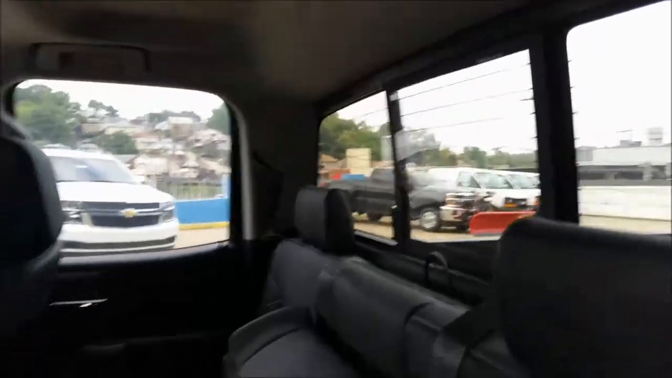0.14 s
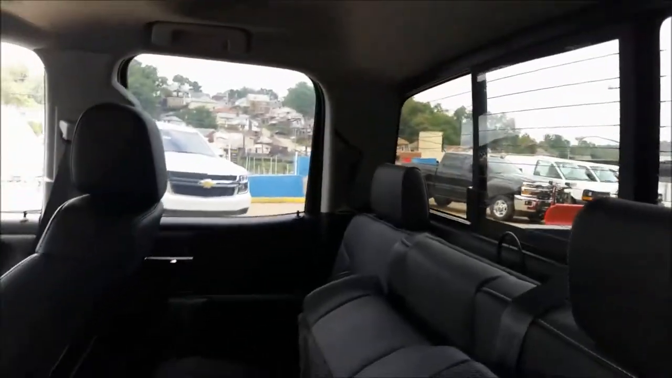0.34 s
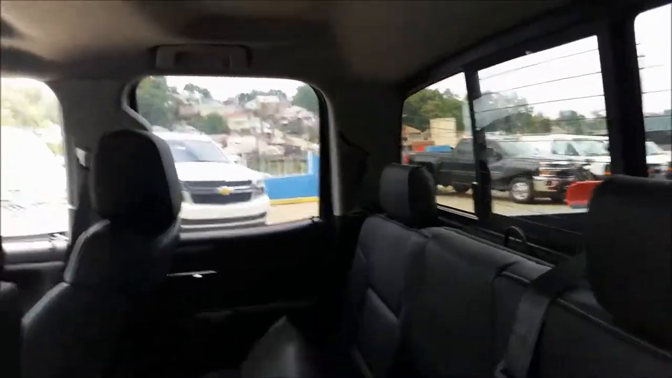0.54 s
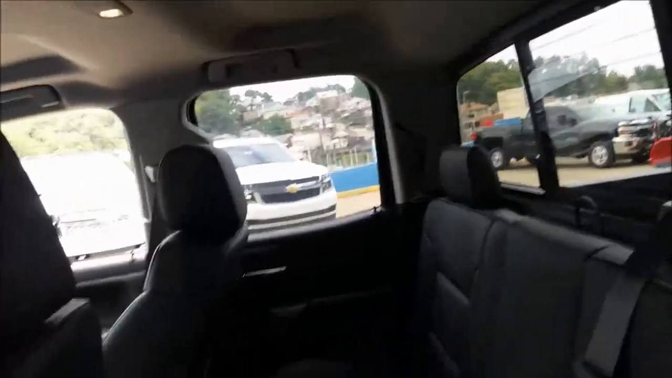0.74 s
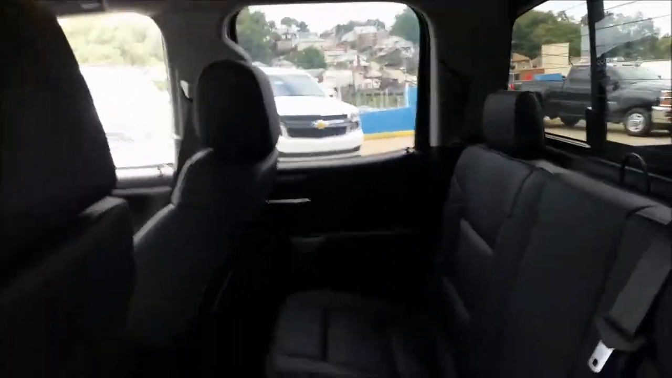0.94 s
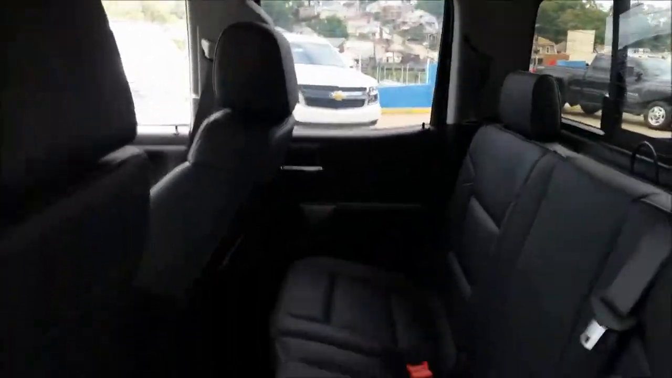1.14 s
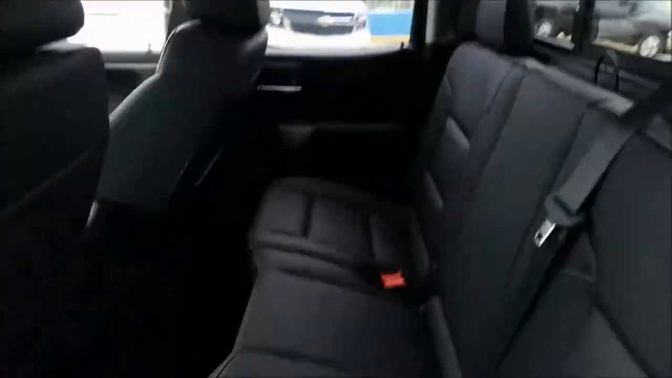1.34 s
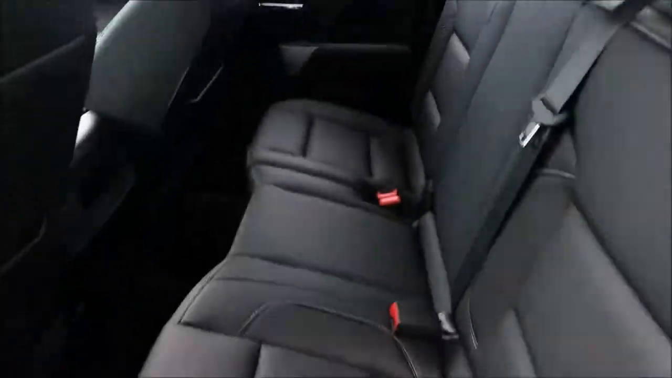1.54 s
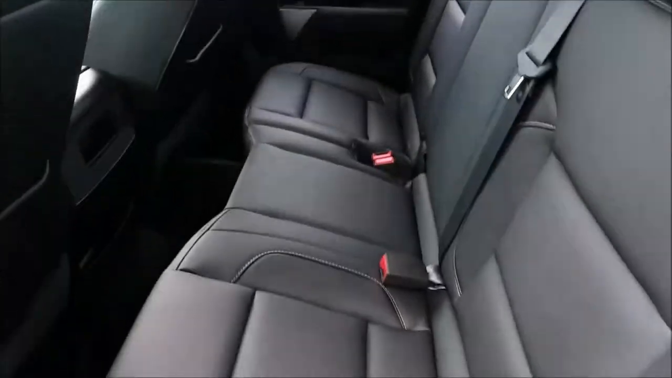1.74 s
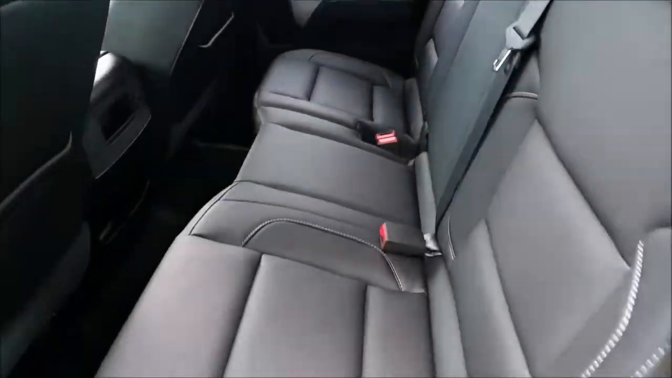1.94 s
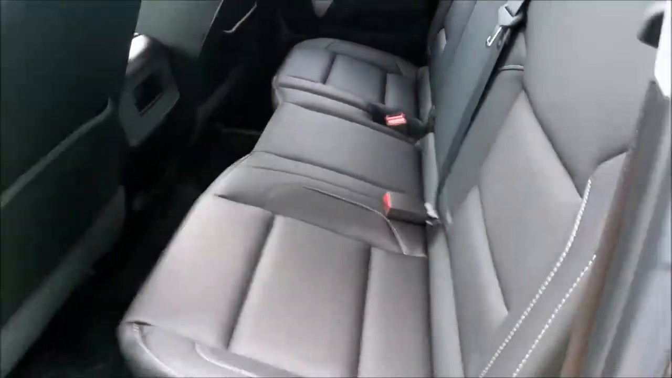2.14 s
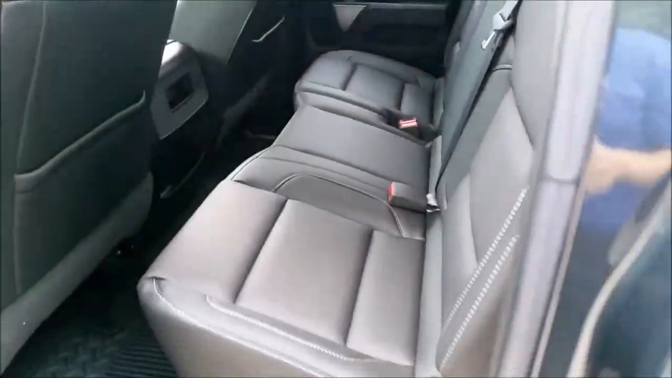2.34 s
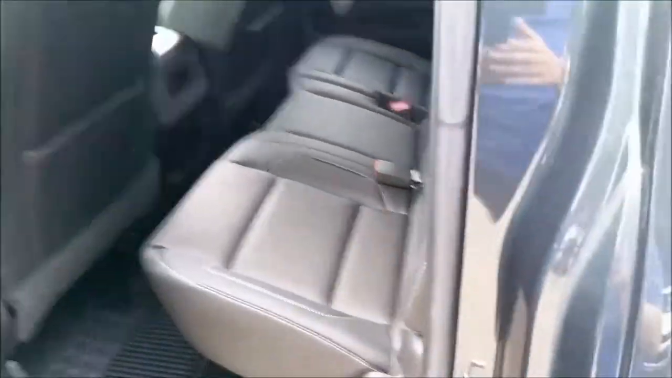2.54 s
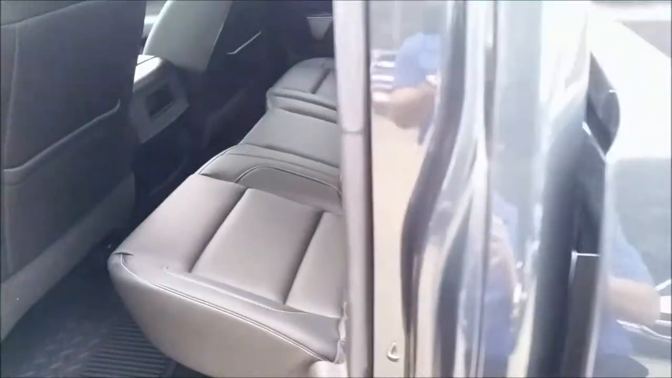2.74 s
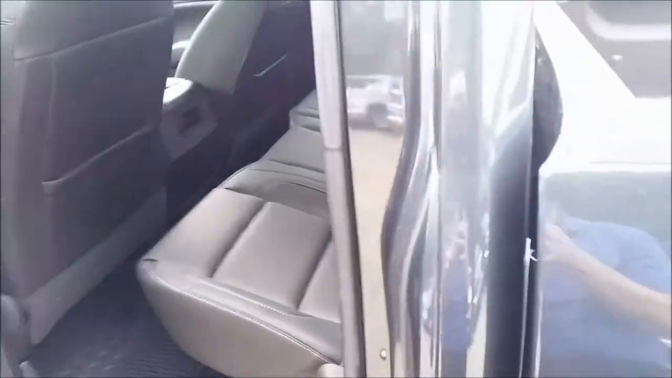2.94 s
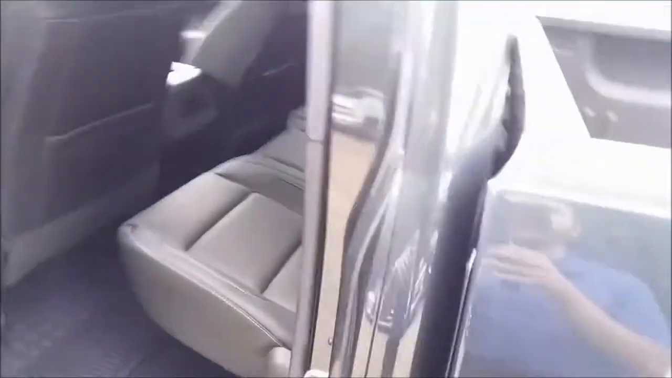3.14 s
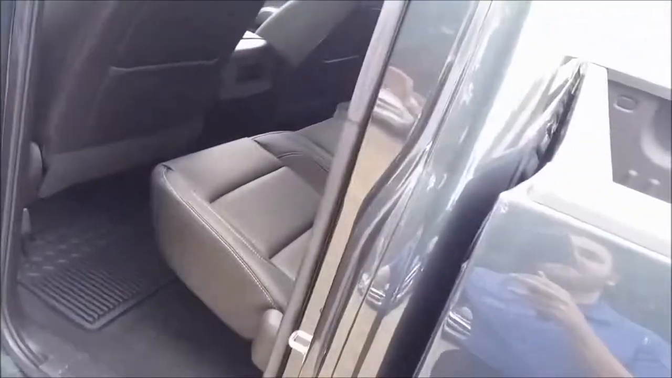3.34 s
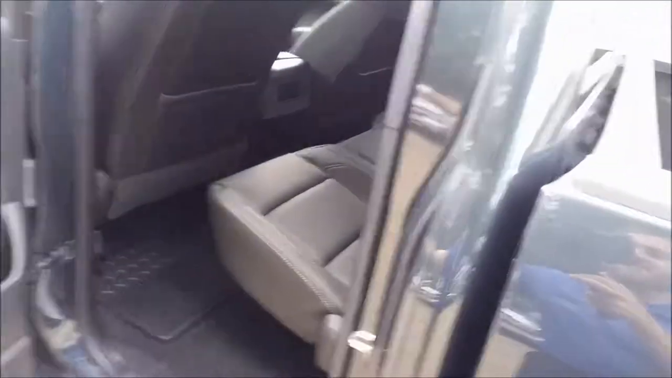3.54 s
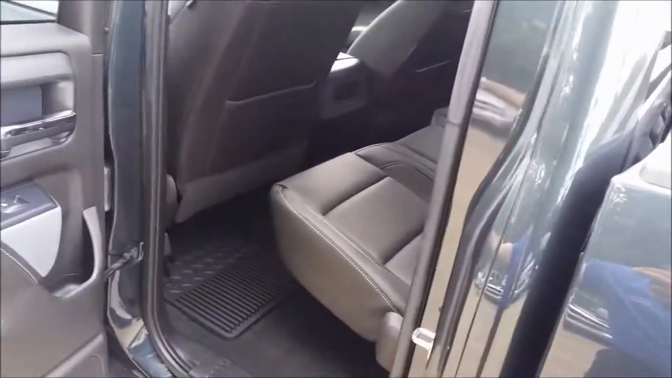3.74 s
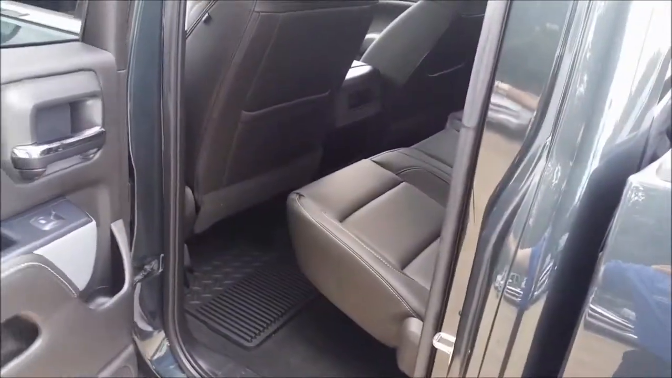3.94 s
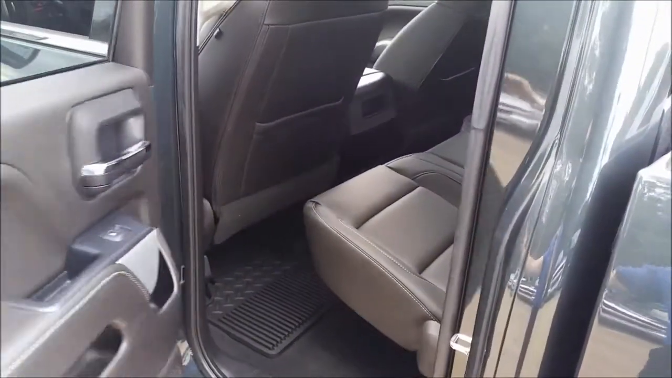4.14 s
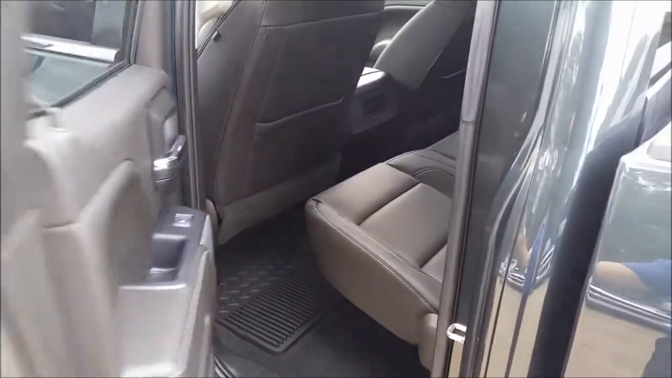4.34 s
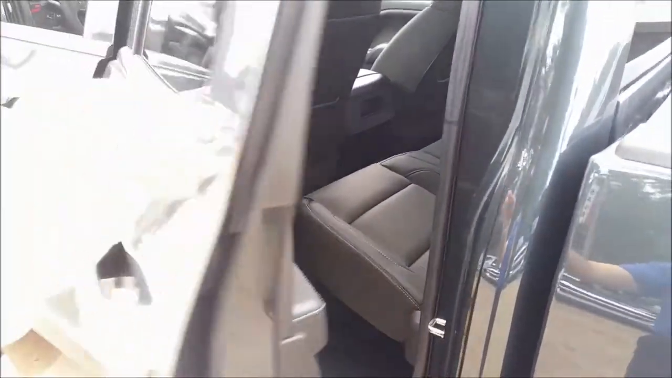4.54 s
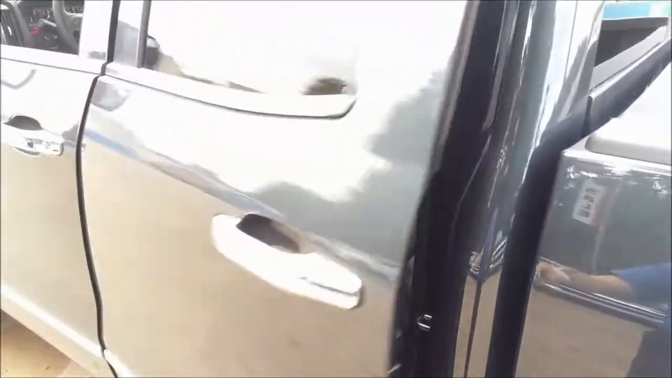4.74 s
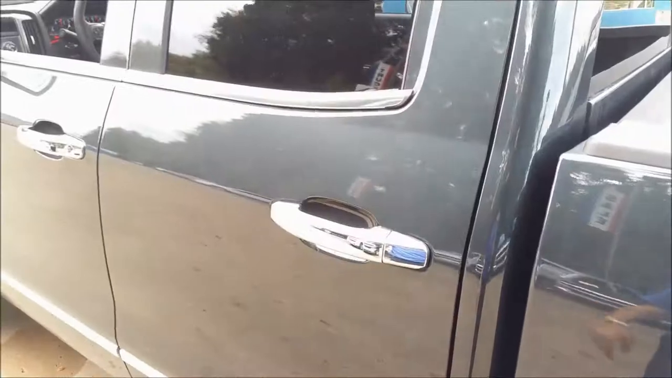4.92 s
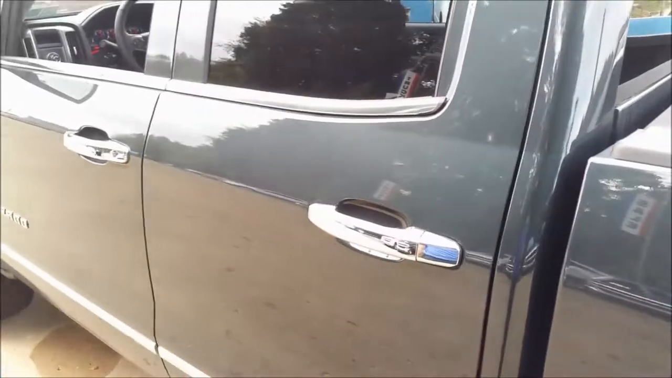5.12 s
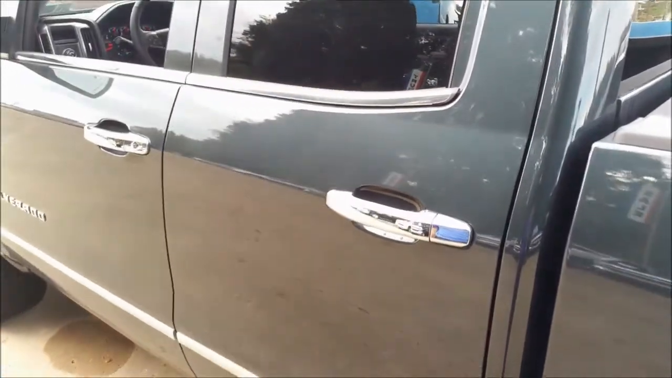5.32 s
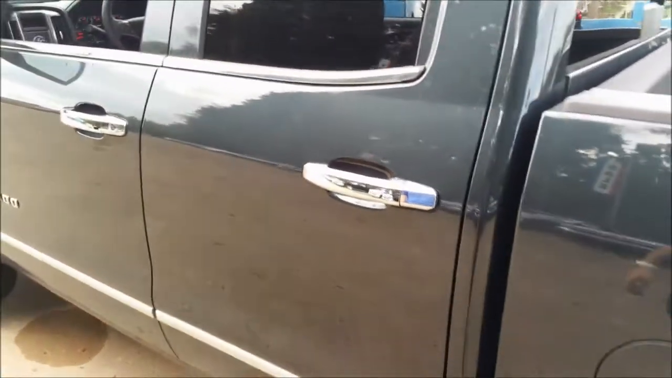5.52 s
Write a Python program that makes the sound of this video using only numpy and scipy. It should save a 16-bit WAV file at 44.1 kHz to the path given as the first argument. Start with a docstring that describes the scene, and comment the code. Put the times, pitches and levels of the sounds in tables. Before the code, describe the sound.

Inside a pickup's cab, with the engine idling as a muffled hum, a seat catch clicks and the leather cushion slides down with a hiss and lands in a heavy, bouncing thud. The microphone moves outside, where the idle grows louder and brighter. The rear door slams with a boom and a snap of the latch, and a loose plastic part knocks four times.

```python
"""Inside a pickup's cab, a hand grips the rear seat and its catch clicks. The cushion slides down with a
hiss of leather and thuds onto its stops. The listener steps outside, where the idling engine is louder.
The rear door is nudged, then slammed: its panels boom and its latch snaps. Last, a loose plastic part
knocks four times, with small rebounds and two faint taps in between. The engine runs throughout,
and a faint, very high chirp comes about once a second."""
import sys
import numpy as np
from scipy import signal
from scipy.fft import rfft, irfft, next_fast_len
from scipy.io import wavfile
from scipy.ndimage import uniform_filter1d, minimum_filter1d

SR = 44100
rng = np.random.default_rng(int(sys.argv[2]) if len(sys.argv) > 2 else 0)


def store_wav(level_fs):
    """Save 16-bit WAV to argv[1]."""
    pcm = np.round(np.clip(np.atleast_2d(level_fs), -1, 1) * 32767)
    wavfile.write(sys.argv[1], SR, pcm.T.astype(np.int16))


N = 246078
TIME = np.arange(N) / SR
RING = SR // 2  # samples given to one blow to die away


def seat():
    """The cushion lands and bounces: its frame hits first, light and hard, then its weight follows."""
    # each hit of the seat: start_s, thud_db, contact_ms, crack_db
    blows = [(0.5294, -22, 0.84, -33), (0.5862, -29, 0.77, -34.5), (.67, -14.5, .4, -34),
             (0.79, -34, 1.06, -28), (.822, 0, 1.09, -15.5), (.848, -5.5, 1.74, -38),
             (0.8618, -7.5, 1.67, -44), (0.9192, -6, 1.33, -31.5), (.926, -12, 1.28, -53),
             (1.014, -19, 1.9, -60)]
    # tones that the seat and cab ring with: pitch_hz, level_db, fade_s
    tones = [(30.9, -10, 0.68), (77.8, -16, 0.66), (132, -7, 0.18), (164, -4.5, 0.12), (191.4, 4.5, 0.047),
             (246, -1.5, 0.029), (324, -5.5, 0.092), (422, -5, 0.045), (520, -3, 0.11), (694, -6, 0.1),
             (840, -5.5, 0.11)]
    # noise of the frame's crack: pitch_hz, level_db
    crack_colour = [(200, 0.5), (500, 14.5), (900, 11.5), (1300, -5), (2800, -1.5), (4500, -11),
                    (7500, -16), (10000, -23), (15500, -29)]
    # noise of the booming cab: pitch_hz, level_db
    boom_colour = [(28, -18), (60, 4), (170, -12), (280, -6.5), (450, -15), (800, -30)]
    weight_delay_s = .006
    out = np.zeros((2, N))
    for start_s, thud_db, contact_ms, crack_db in blows:
        frame = ring(tones, contact_ms * 0.695, lag_ms=0.26)
        crack = burst(crack_colour, 600, rise_ms=1, fade_s=.05, tail_db=-10, tail_s=.2)
        add(out, start_s, undb(thud_db - 11.5) * frame + undb(crack_db) * crack)
        weight = ring(tones, contact_ms, lag_ms=0.16)
        boom = burst(boom_colour, 700, rise_ms=5, fade_s=.13, tail_db=-13, tail_s=.55)
        add(out, start_s + weight_delay_s, undb(thud_db) * (weight + undb(-15.5) * boom))
    return out


def seat_clicks():
    """The seat's catch and the belt buckle give short, bright clicks."""
    # each click: start_s, level_db
    clicks = [(0.5313, -34), (0.5876, -30), (1.022, -18)]
    # noise of a click: pitch_hz, level_db
    colour = [(300, 10), (800, 5), (1300, 2), (2000, -3), (2800, 4), (4000, -11), (5400, 1.5), (6500, -6),
              (7600, -2), (9000, -14), (15500, -15)]
    out = np.zeros((2, N))
    for start_s, level_db in clicks:
        click = burst(colour, 700, rise_ms=0.31, fade_s=0.049, tail_db=-19, tail_s=.11)
        add(out, start_s, undb(level_db - 11.5) * click)
    return out


def leather():
    """Leather rubs on leather in tiny slips and the padding rustles; the drop adds hiss and friction."""
    tip_s, drop_s, land_s = 0.53, 0.705, 0.8313
    grip = envelope(0.445, attack_s=0.038, end_s=0.554, release_s=.05)
    touch = envelope(tip_s, attack_s=0.065, end_s=land_s, release_s=.008)
    speed = envelope(drop_s, attack_s=0.093, end_s=land_s, release_s=0.032)
    sweep = envelope(drop_s, attack_s=0.029, end_s=land_s, release_s=0.072)
    # the three noises: pitch_hz, level_db
    friction_colour = [(300, 4), (800, -15), (1600, 0.5), (3500, -8), (7500, -12), (10000, -18)]
    hiss_colour = [(5000, 3.5), (7500, 9), (9200, 5), (12000, 12), (15500, 12)]
    padding_colour = [(70, 1.5), (200, -10), (350, -12), (700, -17)]
    friction = noise(friction_colour, 600, ripple_db=4.5) * undb(2 * wander(149.8))
    hiss = noise(hiss_colour, 600, ripple_db=3) * undb(0.85 * wander(140))
    padding = noise(padding_colour, 700, ripple_db=1) * undb(2 * wander(32))
    friction *= touch * undb(-48) + speed ** 2 * undb(-29.5)
    hiss *= touch * undb(-55.5) + sweep * undb(-31.5)
    padding *= grip * undb(-38) + (touch + sweep) / 2 * undb(-31)
    return (friction + hiss + padding) * pan(-1.5)


def door():
    """The door is nudged, then slams onto its seal and two catches, and the panels shudder."""
    # each hit of the door: start_s, level_db, contact_ms
    blows = [(4.269, -26, 2.56), (4.442, -21, 2.37), (4.931, -20, 1.05), (4.948, -1, 0.57),
             (4.9613, -16, 1.3), (4.976, -6, .8), (4.997, -11.5, 0.66), (5.011, -10, 1.18),
             (5.098, -19, 2.7)]
    # tones that the door and truck body ring with: pitch_hz, level_db, fade_s
    tones = [(35.6, -21, 0.33), (63.4, -16, 0.24), (100, -27, 0.14), (133.2, 2, 0.16), (178, 1.5, 0.16),
             (234.4, 6, 0.17), (272, -12, 0.16), (368, -1.5, 0.13), (431, -15, 0.39), (550, -29, 0.18),
             (805, 13.5, 0.025), (810, 5, 0.058), (920, -13, .13), (1010, -11, .14), (1070, -16, .16)]
    # boom of the hollow inside the door: pitch_hz, level_db
    boom_colour = [(28, 3.5), (60, 5), (95, -22), (160, -0.5), (235, -2), (330, -1.5), (500, -15.5),
                   (900, -23.5)]
    # clatter of the sheet metal: pitch_hz, level_db
    metal_colour = [(100, -12), (250, 7.5), (520, 1.5), (950, 5.5), (1400, -2), (1700, -3.5), (2100, -19),
                    (3200, -30), (6000, -60)]
    # snap of the latch: pitch_hz, level_db
    snap_colour = [(1200, 13.5), (2400, 4), (4000, -6), (6000, -11), (8000, -9.5), (10000, -19),
                   (15500, -17)]
    out = np.zeros((2, N))
    for start_s, level_db, contact_ms in blows:
        thud = ring(tones, contact_ms, lag_ms=-0.012)
        boom = burst(boom_colour, 870, rise_ms=6.8, fade_s=0.28, tail_db=-13, tail_s=0.48)
        metal = burst(metal_colour, 2000, rise_ms=0.62, fade_s=0.037, tail_db=-16.5, tail_s=0.15)
        snap = burst(snap_colour, 1800, rise_ms=1.5, fade_s=0.045, tail_db=-14.5, tail_s=0.22)
        # a longer, softer contact gives less clatter and snap
        metal *= undb(2.5 - 12 * contact_ms)
        snap *= undb(-14.5 - 6 * contact_ms)
        add(out, start_s, undb(level_db) * (thud + undb(-14.5) * boom + metal + snap))
    return out


def latch():
    """The door's latch hits the metal loop that holds it and rings."""
    # each hit of the latch: start_s, level_db, contact_ms
    blows = [(4.9371, -12, 0.17), (4.948, -14.5, 0.075), (4.9765, -10.5, 0.074)]
    # tones that the latch rings with: pitch_hz, level_db, fade_s
    tones = [(1150, -19, .15), (1286, 5, 0.054), (1306, 1.5, 0.063), (1430, -5, 0.11), (2064, -14.5, 0.1),
             (2530, -18, 0.11)]
    out = np.zeros((2, N))
    for start_s, level_db, contact_ms in blows:
        add(out, start_s, undb(level_db) * ring(tones, contact_ms, lag_ms=0.054))
    return out * pan(-2)


def rattle():
    """After each knock the loose plastic part rebounds twice, sooner and weaker each time."""
    # four knocks and two faint taps: start_s, level_db, rebound_gap_s
    knocks = [(5.0797, -7, .011), (5.148, -29.5, 0.0045), (5.2004, -7.5, 0.011), (5.2883, -35, 0.0056),
              (5.3295, -12, 0.01), (5.4556, -13, .0138)]
    out = np.zeros((2, N))
    for start_s, level_db, gap_s in knocks:
        add(out, start_s, knock(level_db))
        add(out, start_s + gap_s, knock(level_db - 9.5))
        add(out, start_s + gap_s * 1.55, knock(level_db - 15.5))
    return out


def knock(level_db):
    """One knock of the plastic part, duller when weak; the side of the truck scatters it."""
    # tones that the plastic rings with: pitch_hz, level_db, fade_s
    tones = [(381, -2.5, 0.066), (452, 3, 0.04), (589, 5.5, 0.052), (850, -16.5, 0.05), (1128, -3.5, 0.029),
             (1610, -16, 0.026), (1990, -19, 0.025), (2450, -8, 0.0085), (2700, -14, 0.0067),
             (3540, -17, .01), (5100, -14, 0.0055), (7000, -13, 0.0049)]
    # sound bouncing off the truck: pitch_hz, level_db
    scatter_colour = [(300, 5.5), (700, 7), (1600, -10.5), (2700, -8), (4300, -20), (5500, -21.5),
                      (9500, -37), (15000, -39)]
    contact_ms = 0.058 * undb(-0.21 * level_db)
    direct = disperse(ring(tones, contact_ms, lag_ms=-0.032), hz=940)
    scatter = burst(scatter_colour, 2300, rise_ms=0.35, fade_s=0.04, tail_db=-15.5, tail_s=0.2)
    return undb(level_db) * (direct + undb(-15) * scatter)


def idle():
    """The engine idles: a low rumble and a rush of air that throbs each time a cylinder fires."""
    # the background dips after the seat thud, recovers, is louder outside,
    # and dips again after the door slam: time_s, level_db
    opening = [(0, -53.5), (0.162, -53.5), (0.45, -52)]
    dip_and_rise = [(1.2, -59), (1.66, -59.5), (2.1, -55.5), (2.48, -50.5),
                    (3.22, -49), (3.57, -49.5), (4.85, -49)]
    second_dip = [(5.28, -54), (5.58, -54.5)]
    level_db = np.interp(TIME, *np.transpose(opening + dip_and_rise + second_dip))
    firing_hz = 36.1 * (1 + .003 * wander(3))
    phase = 2 * np.pi * np.cumsum(firing_hz) / SR
    low = through_cab(exhaust(phase), fan_hum())
    return undb(level_db) * (undb(11.5) * low + undb(2.5) * engine_rush(phase) * pan(-2.2))


def exhaust(phase):
    """The engine's firings make a deep, wavering note over an uneven rumble."""
    # tones of the exhaust: multiple_of_firing_rate, level_db
    tones = [(1, -7), (2, -1), (4, -5), (8, -22)]
    # noise of the rumble: pitch_hz, level_db
    rumble_colour = [(20, -33), (34, -36), (55, -5.5), (78, 1.5), (110, -1.5), (165, -5.5), (240, -12.5),
                     (400, -16), (650, -24)]
    note = sum(undb(db + 1.5 * wander(7)) * np.sin(multiple * phase + rng.uniform(0, 2 * np.pi))
               for multiple, db in tones)
    return note + undb(0.5) * noise(rumble_colour, 420, ripple_db=-0.5)


def fan_hum():
    """The fan and pumps hum and whine, drifting a little in pitch and loudness."""
    # tones of the fan and pumps: pitch_hz, level_db
    tones = [(58, -6.5), (116, -6.5), (231.6, -5.5), (360, -28), (986, -31), (1682, -27.5)]
    drifting_time = TIME + np.cumsum(0.0011 * wander(4)) / SR
    return sum(undb(db + 1.5 * wander(4)) * np.sin(2 * np.pi * hz * drifting_time) for hz, db in tones)


def through_cab(rumble, hum):
    """The cab muffles the engine and adds a hollow sound until the listener leaves it."""
    leave_s, leaving_takes_s = 2.24, 0.62
    inside = np.clip(1 - (TIME - leave_s) / leaving_takes_s, 0, 1)
    upper_band = signal.butter(1, [140, 330], "bandpass", fs=SR, output="sos")
    upper_rumble = signal.sosfilt(upper_band, rumble)
    hollow = undb(-9) * noise([(350, -2), (550, -0.5), (800, -2.5), (1100, -13)], 580, ripple_db=6)
    return rumble + hum * undb(-5.5 * inside) + inside * (hollow - 0.21 * upper_rumble)


def engine_rush(phase):
    """Swirling air rushes and whirrs around the engine, throbbing with the firings."""
    # noise of the rush: pitch_hz, level_db
    colour = [(240, -53), (400, -0.5), (445, -10.5), (718, -6), (961, -12.5), (1040, -9.5), (1670, -11.5),
              (2140, -11.5), (2530, -14), (3900, -21.5), (5550, -28), (6470, -24), (9660, -39),
              (13300, -33.5), (15800, -43)]
    # narrow bands where the engine bay rings: pitch_hz, width_hz, level_db
    whirrs = [(302.5, 18, -10.5), (416, 31, -14), (604, 56, -21.5), (979, 7.9, -11), (1363, 86, -12),
              (2390, 110, -23), (2650, 40, -18.5), (4600, 360, -21.5), (6000, 90, -29), (6150, 84, -26),
              (6870, 150, -26.5)]
    rush = noise(colour, 417, ripple_db=3.5)
    rush += sum(undb(db) * whirr(hz, width_hz) for hz, width_hz, db in whirrs)
    throb = 1 + 0.05 * np.cos(phase)
    flutter = undb(.5 * wander(11))
    return rush * throb * flutter


def chirps():
    """A faint, very high chirp about once a second."""
    first_s, every_s, length_s = 0.29, 1.016, .094
    age_s = (TIME - first_s) % every_s
    swell = np.sqrt(np.clip(1 - (2 * age_s / length_s - 1) ** 2, 0, 1))
    return undb(-81) * swell * whirr(hz=10870, width_hz=60)


def ring(tones, contact_ms, lag_ms):
    """A struck object rings, duller after a longer contact. The left ear hears it lag_ms later."""
    t = np.arange(RING) / SR
    body = sum(undb(db) * fade(fade_s) * np.sin(2 * np.pi * hz * t) for hz, db, fade_s in tones)
    ear_delay_ms = np.array([[max(lag_ms, 0)], [max(-lag_ms, 0)]])
    push_time = (t[:SR // 20] * 1000 - ear_delay_ms) / max(contact_ms, .02) - 3
    push_and_release = -push_time * np.exp(-push_time ** 2)
    sound = signal.fftconvolve(body[None], push_and_release, axes=1)[:, :RING]
    return sound / np.abs(sound).max()


def burst(colour, apart_hz, rise_ms, fade_s, tail_db, tail_s):
    """Countless tones blur into noise: a quick rise, then a crack and a weaker, longer tail."""
    rise = 1 - np.exp(-(np.arange(RING) / SR * 1000 / rise_ms) ** 2)
    decay = fade(fade_s) + undb(tail_db) * fade(tail_s)
    return noise(colour, apart_hz, ripple_db=3.5, size=RING) * rise * decay


def noise(colour, apart_hz, ripple_db, size=N):
    """Noise shaped by colour (pitch_hz, level_db): alike in both ears below apart_hz, unrelated above."""
    fft_size = next_fast_len(size, True)
    hz = np.fft.rfftfreq(fft_size, 1 / SR) + 1
    points_hz, db = np.transpose(colour)
    # nearby reflections make some pitches louder and others softer
    grid_hz = np.arange(0, SR / 2, 60)
    ripple = np.interp(hz, grid_hz, rng.standard_normal(len(grid_hz))) * hz / (hz + 500)
    gain = undb(np.interp(np.log(hz), np.log(points_hz), db) + ripple_db * ripple)
    # fall away beyond both ends of the colour
    gain /= np.sqrt((1 + (.7 * points_hz[0] / hz) ** 6) * (1 + (.7 * hz / points_hz[-1]) ** 6))
    middle, side = rfft(rng.standard_normal((2, fft_size)))
    width = 0.12 + hz ** 2 / (hz ** 2 + apart_hz ** 2)
    ears = middle + np.outer([1, -1], width) * side
    return unit(irfft(gain * ears)[:, :size])


def whirr(hz, width_hz):
    """Noise ringing around one pitch, unrelated in the two ears."""
    resonance = signal.iirpeak(hz, hz / width_hz, fs=SR)
    return unit(signal.lfilter(*resonance, rng.standard_normal((2, N))))


def disperse(sound, hz):
    """Bending waves carry high pitches ahead of low ones, turning a click into a woody knock."""
    pole = np.exp(-2 * np.pi * hz / SR)
    for _ in range(2):
        sound = signal.lfilter([-pole, 1], [1, -pole], sound)
    return sound


def envelope(start_s, attack_s, end_s, release_s):
    """Rise from start_s, hold, and fall to nothing at end_s."""
    return np.clip(np.minimum((TIME - start_s) / attack_s, (end_s - TIME) / release_s), 0, 1)


def fade(fade_s):
    """Die away by 60 dB every fade_s seconds."""
    return np.exp(-np.log(1000) * np.arange(RING) / SR / fade_s)


def wander(rate_hz):
    """Glide between random values about 1 in size, rate_hz times a second."""
    step = int(SR / rate_hz)
    stairs = np.repeat(rng.standard_normal(N // step + 1), step)
    return 1.164 * uniform_filter1d(stairs, step)[:N]


def add(out, start_s, sound):
    """Mix a sound in at start_s."""
    start = int(start_s * SR)
    out[:, start:start + RING] += sound[..., :N - start]


def pan(db):
    """Gains that make the left ear db louder than the right."""
    return undb([[db / 2], [-db / 2]])


def undb(db):
    """Turn decibels into a gain."""
    return 10 ** (np.asarray(db) / 20)


def unit(x):
    """Scale to an average (rms) level of 1."""
    return x / np.sqrt(np.mean(x ** 2))


def scene():
    """All sources together."""
    return idle() + chirps() + leather() + seat() + seat_clicks() + door() + latch() + rattle()


def record(dry):
    """Lift the right side a little, turn down peaks above full scale and cut the highest treble."""
    sound = dry * pan(-.5)
    window, top_hz = SR // 200, 15900
    safe_gain = 1 / np.maximum(np.abs(sound).max(axis=0), 1)
    smooth_gain = uniform_filter1d(minimum_filter1d(safe_gain, window), window)
    treble_cut = signal.ellip(10, .2, 70, top_hz, fs=SR, output="sos")
    return signal.sosfilt(treble_cut, sound * smooth_gain)


dry = scene()
out = record(dry)
store_wav(out)
```